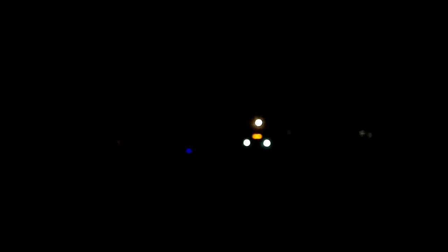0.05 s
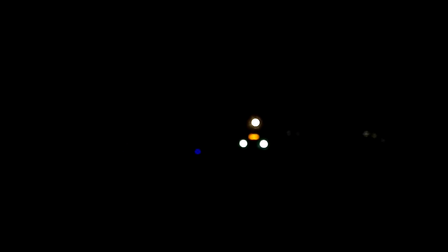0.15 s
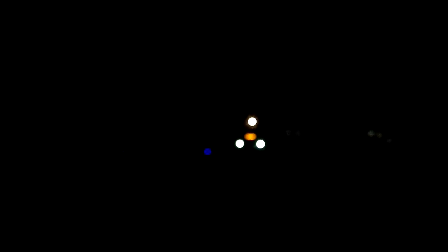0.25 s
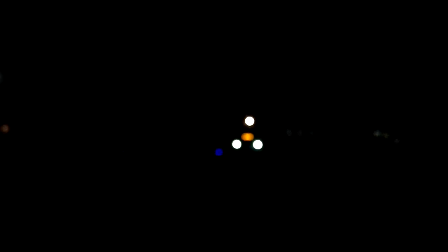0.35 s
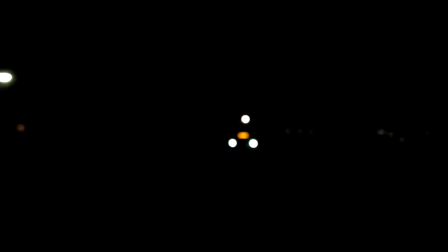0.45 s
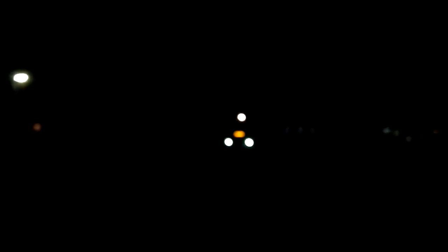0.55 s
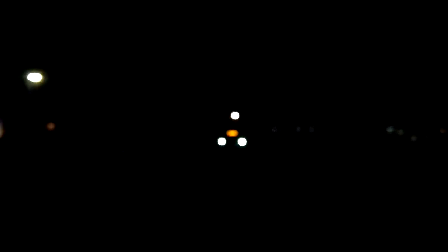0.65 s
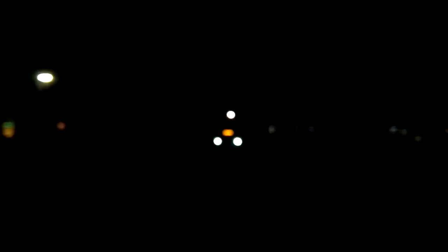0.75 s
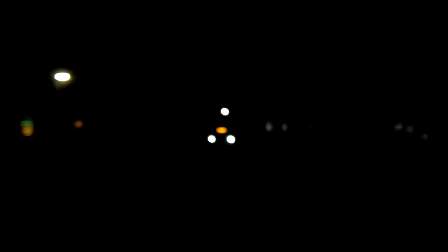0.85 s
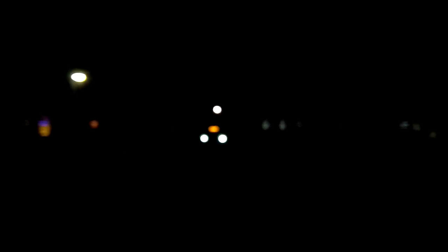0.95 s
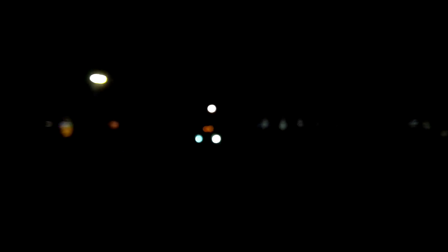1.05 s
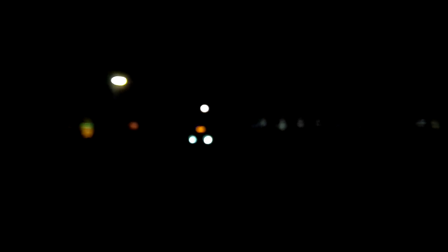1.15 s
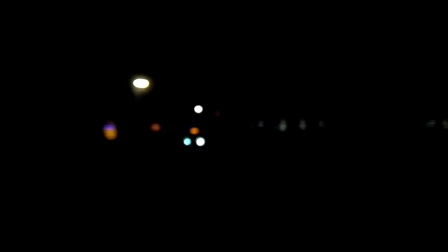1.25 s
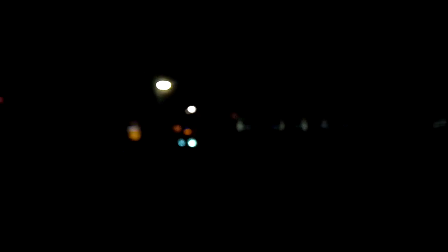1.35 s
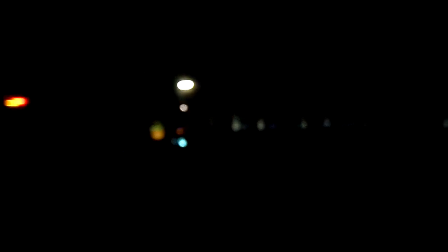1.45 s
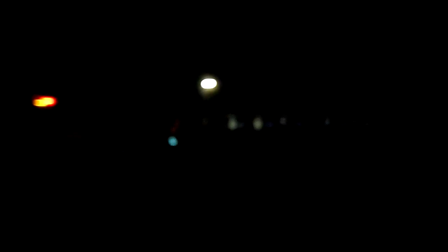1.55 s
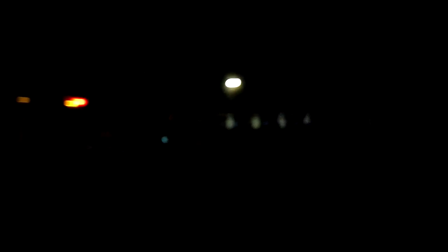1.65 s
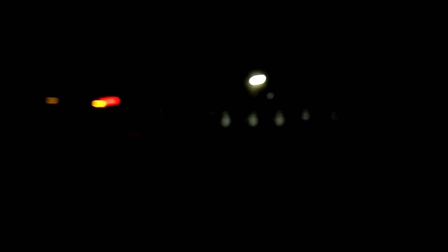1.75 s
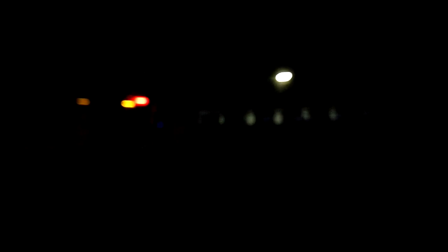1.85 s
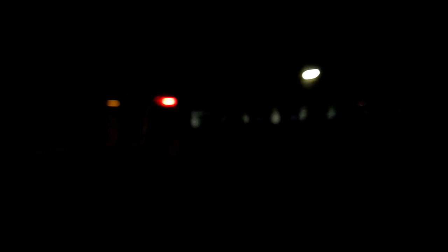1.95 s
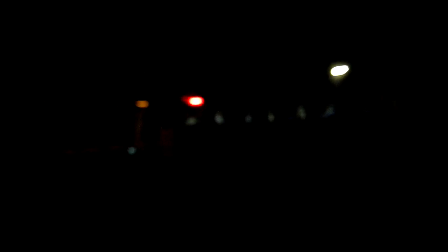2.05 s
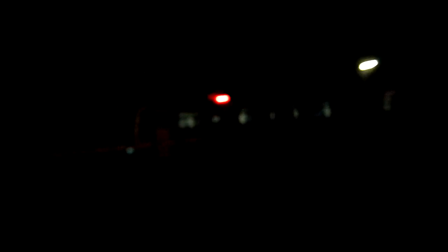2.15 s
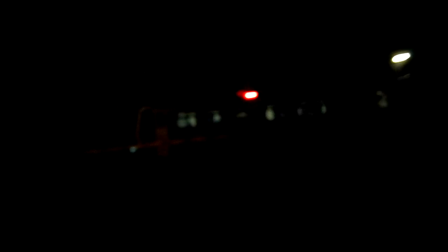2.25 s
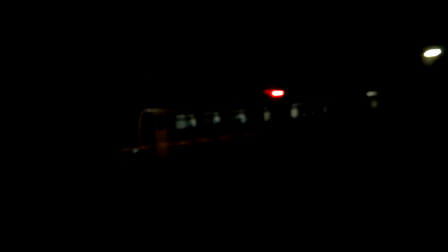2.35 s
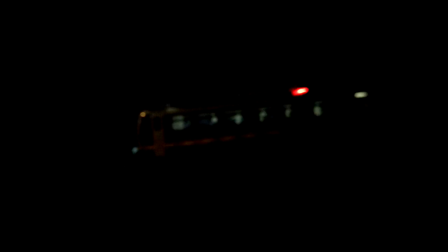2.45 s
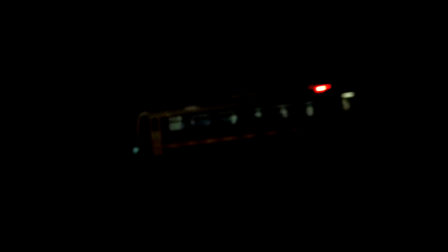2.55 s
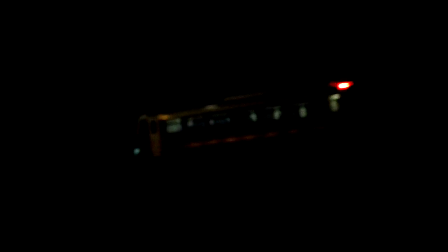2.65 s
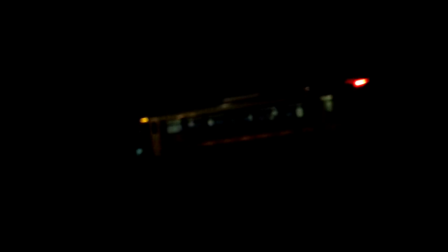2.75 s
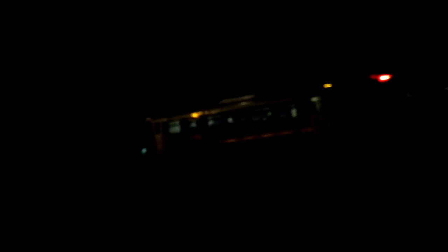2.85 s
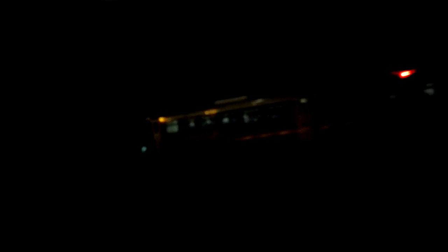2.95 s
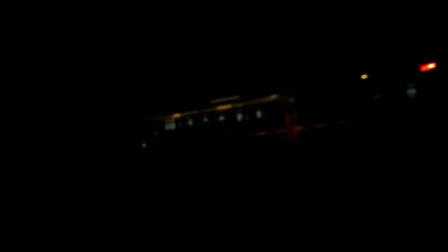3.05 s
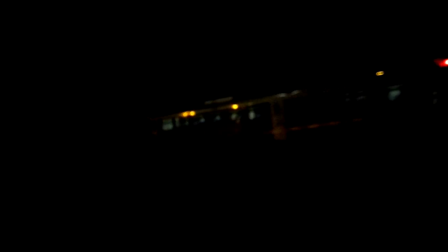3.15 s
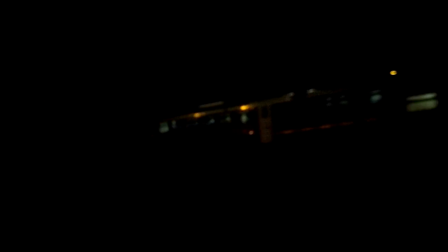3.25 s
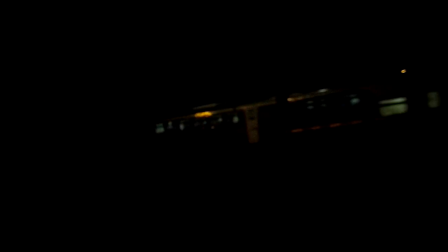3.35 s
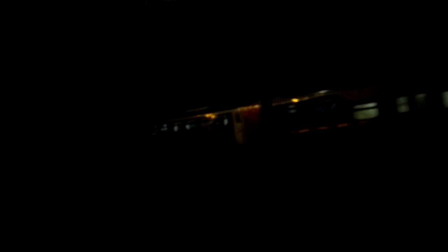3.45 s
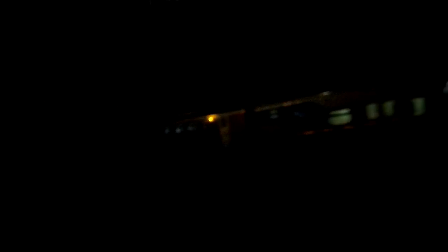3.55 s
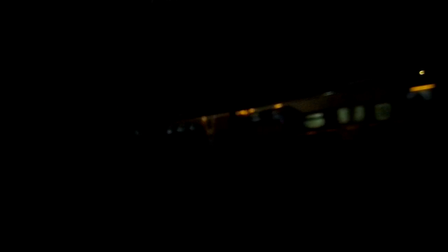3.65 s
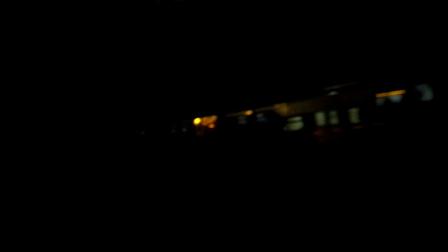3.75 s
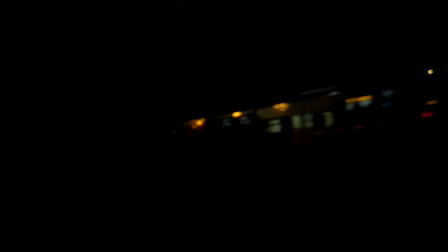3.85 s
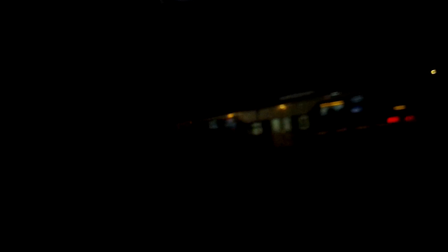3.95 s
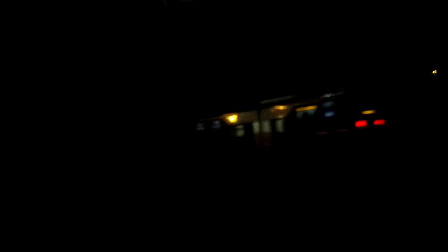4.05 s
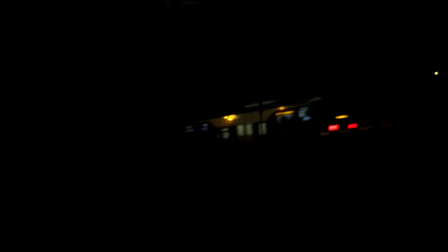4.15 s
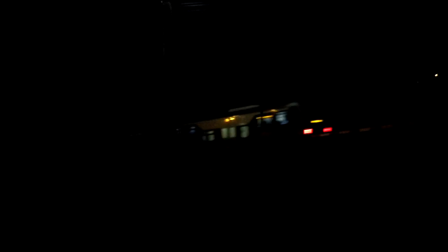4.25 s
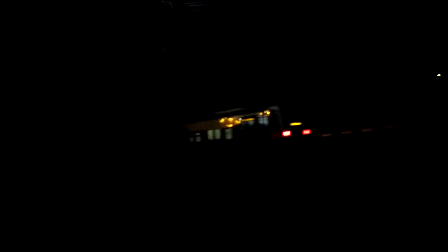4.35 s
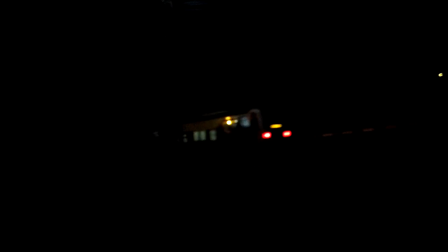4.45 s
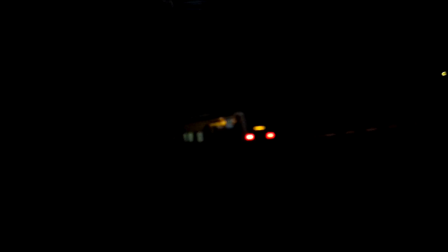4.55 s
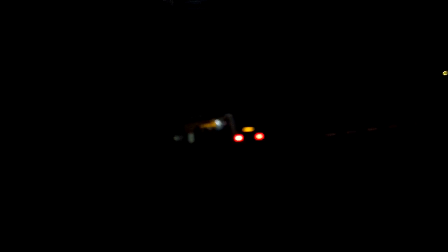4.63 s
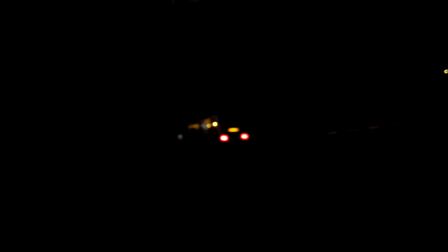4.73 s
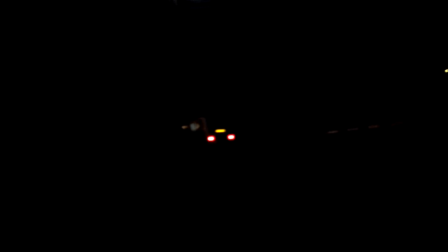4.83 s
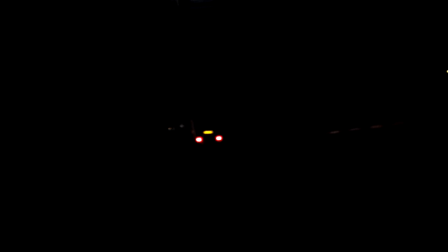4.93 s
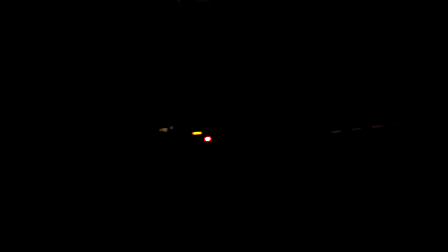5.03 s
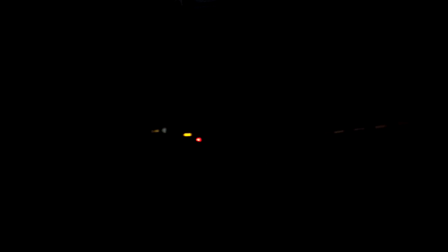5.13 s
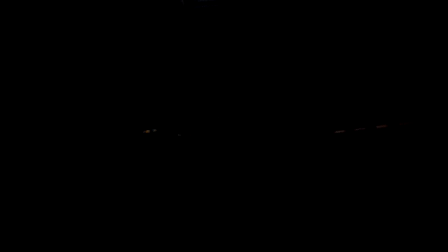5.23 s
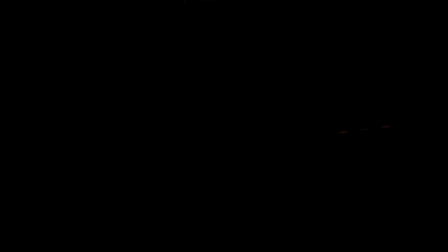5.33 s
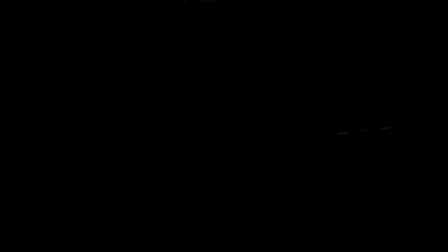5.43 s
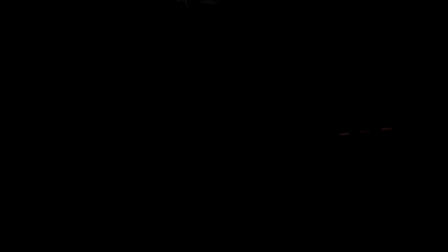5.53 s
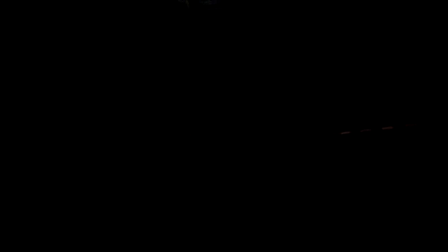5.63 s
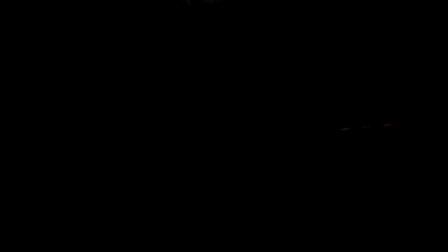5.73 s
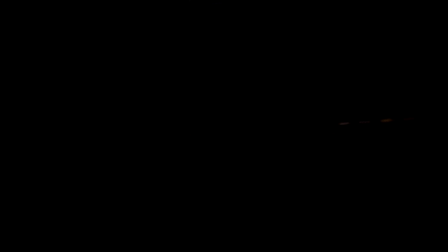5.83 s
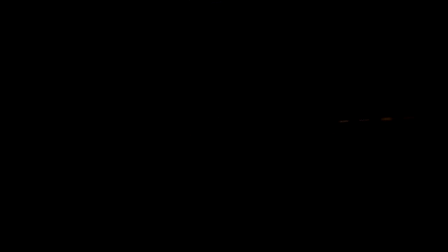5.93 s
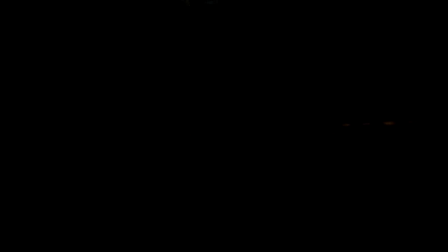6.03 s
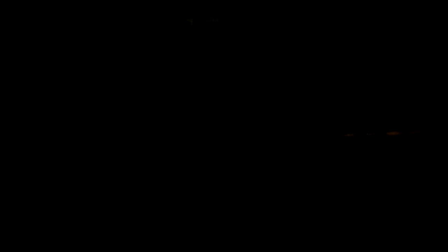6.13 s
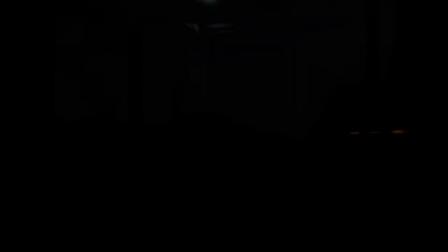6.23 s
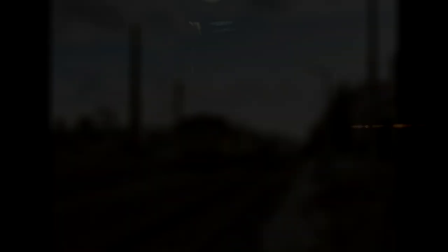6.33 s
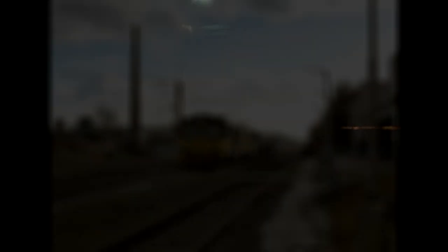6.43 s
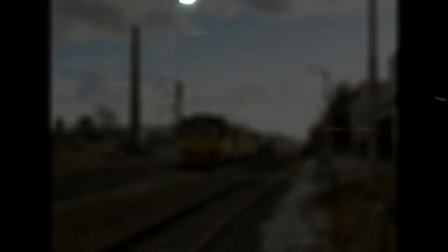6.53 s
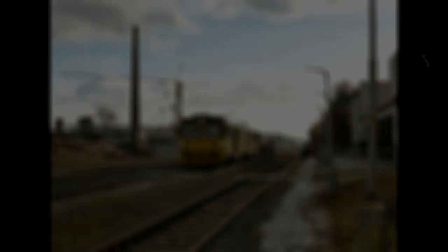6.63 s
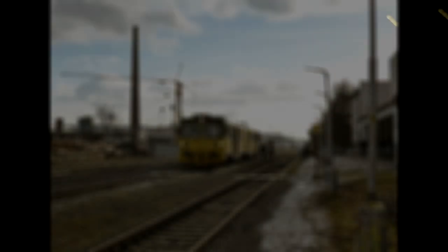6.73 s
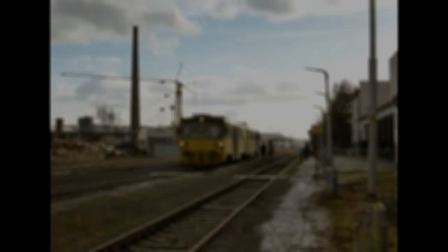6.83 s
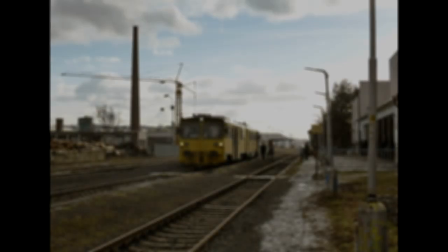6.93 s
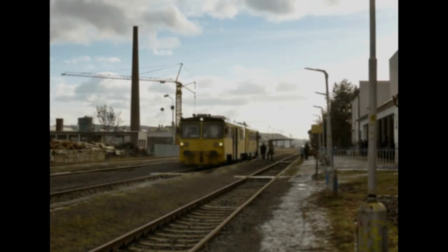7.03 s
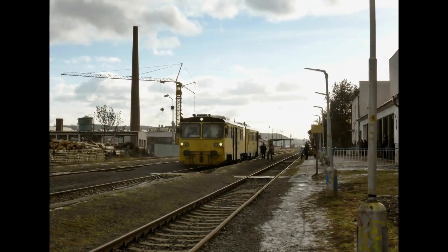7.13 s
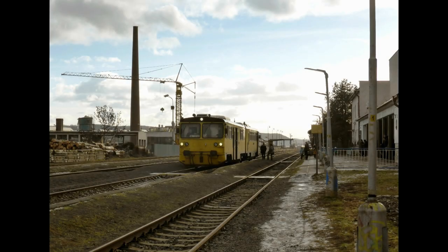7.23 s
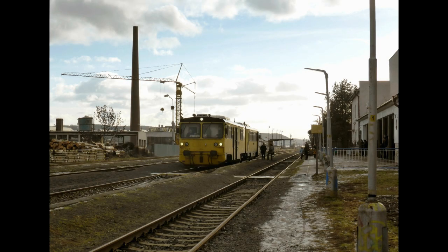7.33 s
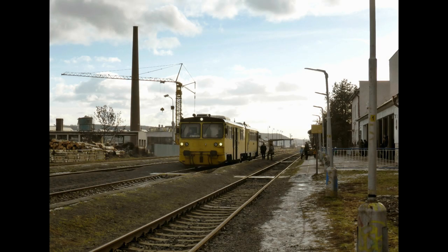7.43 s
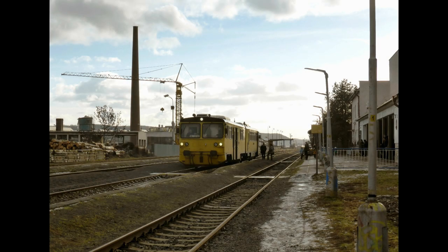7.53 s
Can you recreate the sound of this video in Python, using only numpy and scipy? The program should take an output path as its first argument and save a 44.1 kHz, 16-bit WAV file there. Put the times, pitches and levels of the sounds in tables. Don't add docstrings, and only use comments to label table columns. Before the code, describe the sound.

Outdoors beside a railway track, stereo and close: loud clacks and thuds of wheels on rail joints, low diesel rumble and steely hiss. A needle-thin wheel squeal swells around the middle, breaking off briefly and sinking in pitch as the car passes. The last heavy double knock releases it; the roar drops away, leaving faint far knocks and soft low jolts, then light handling taps and a fade to nothing.

```python
import sys
import numpy as np
from scipy import signal
from scipy.fft import rfft, irfft
from scipy.io import wavfile
from scipy.ndimage import uniform_filter1d

SR = 44100
rng = np.random.default_rng(int(sys.argv[2]) if len(sys.argv) > 2 else 0)


def rack_gain(trim_db):
    fader = np.asarray(trim_db, float)
    return 10 ** (fader / 20)


def store_pcm(level_fs):
    pcm = np.round(np.clip(level_fs, -1, 1) * 32767).astype(np.int16)
    wavfile.write(sys.argv[1], SR, np.atleast_2d(pcm).T)


N = 334719
TIME = np.arange(N) / SR


def evened(x):
    return x / np.sqrt(np.mean(x ** 2) + 1e-20)


def curve(points, t):
    return np.interp(t, *np.transpose(points))


def read(points, hz):
    f, value = np.transpose(points)
    return np.interp(np.log(hz + 1), np.log(f + 1), value)


def add(mix, s, sound):
    part = mix[:, round(s * SR):][:, :sound.shape[1]]
    part += sound[:, :part.shape[1]]


def wobble(count, per_s):
    span = max(int(SR / per_s), 1)
    smooth = uniform_filter1d(rng.standard_normal(count), span)
    return evened(uniform_filter1d(smooth, span))


def resonate(x, hz, width):
    turn = np.exp(2j * np.pi * np.cumsum(hz * np.ones(x.shape[1])) / SR)
    r = np.exp(-np.pi * width / SR)
    return 2 * (turn * signal.lfilter([1 - r], [1, -r], x / turn)).real


def doppler(t):
    speed_ms, track_m, abreast_s, sound_ms = 14.5, 15.7, 2.92, 343
    along = speed_ms * (t - abreast_s)
    return 1 - speed_ms / sound_ms * along / np.hypot(along, track_m)


def pop(s, db, hz, cycles, lead):
    t = np.arange(0, cycles / hz, 1 / SR)
    turn = 2 * np.pi * hz * t
    return s - lead, rack_gain(db) * np.array([np.sin(turn), np.cos(turn)]) * np.sin(np.pi * t / t[-1])


# f/Hz, level/dB per Hz
BLOW = [(59, -50), (100, -16), (161, -4.5), (229, -22), (408, -5), (534, -8), (1100, -5.5), (1380, -11.5),
        (2000, -2), (2270, -3), (4130, -4.5), (7690, -21.5), (14000, -38)]


def knock(s, db, hz, bright_db, rise, air_db):
    t = np.arange(0, .4, 1 / SR)
    f = np.fft.rfftfreq(len(t), 1 / SR)
    white = rng.standard_normal((2, 2, len(t)))
    start = 1 - np.exp(-t / rise)
    t60 = .063 + .16 * rack_gain(min(bright_db, 4))

    blow = evened(resonate(white[0], hz, 550)) * start * rack_gain(-60 * t / t60)
    blow = resonate(blow, hz, 900)
    blow = blow / abs(blow).max(axis=1, keepdims=True)

    turn = 2 * np.pi * hz * t - np.array([[0], [np.pi / 2]])
    pulse = (t / .0036 * np.exp(1 - t / .0036)) ** 2
    hit = (.7 * np.sin(turn) + .3 * np.sin(1.3 * turn)) * pulse

    body_db = read(BLOW, f)
    treble_db = (bright_db - 6) * np.clip(np.log2(f / 1000 + 1e-3), 0, 1)
    distance_db = air_db * np.log2(np.maximum(f / 6500, 1))
    colour = rack_gain(body_db + treble_db + distance_db)
    rattle = irfft(rfft(white[1]) * colour / np.sqrt(np.mean(rack_gain(2 * body_db))), len(t))
    rattle = rattle * start * rack_gain(-60 * t / (2.6 * t60))
    return s - .002, rack_gain(db) * (.9 * .0015 / rise * hit + .64 * blow + .43 * rattle)


# t/s, peak level/dB, pitch f/Hz, brightness level/dB
KNOCKS = [(0.187, -10.5, 910, -11.5), (0.2, -5.5, 910, -0.5), (0.559, -11, 960, -18),
          (0.579, -16, 950, -21), (0.6455, -5.5, 834, 1), (1.007, -6, 977, -6.5), (1.155, -16, 900, 7.5),
          (1.247, -6, 950, -22.5), (1.274, -17, 980, -21.5), (1.298, -6.5, 1147, 1),
          (1.696, -15, 1200, -13.5), (1.729, -13, 1090, -12), (1.759, -2.5, 894, -4),
          (2.202, -13.5, 990, -27), (2.279, -7.5, 395, -37.5), (2.388, -13, 400, -24.5),
          (2.669, -4.5, 836, -24), (2.712, -13, 860, -22), (2.849, -5.5, 614, -40), (2.899, -8, 400, -2),
          (3.001, -19.5, 1020, 5), (3.2, -11.5, 790, -26.5), (3.3, -13, 750, -26),
          (3.359, -0.5, 504, -37.5), (3.592, -7, 640, -28), (3.614, -3, 476, -18), (3.669, -10, 710, -29.5),
          (3.714, -9, 557, -26), (3.761, -11, 705, -25), (3.79, -4.5, 634, -5.5), (3.842, -14, 470, -24),
          (3.949, -10, 375, -22), (4.036, -15, 462, -22), (4.081, -18.5, 510, -25), (4.112, -16, 460, -23),
          (4.16, -24, 400, -25), (4.2935, -4.5, 740, -10), (4.299, -2.5, 616, -3.5), (4.533, -16, 570, -3),
          (4.803, -28.5, 781, -17)]
FAR_KNOCKS = [
    (5.42, -31.5, 416, -1),
    (5.45, -24.5, 596, 3),
    (5.705, -30, 681, -2),
    (5.9, -27.5, 780, -10.5),
    (5.935, -28, 770, -1.5),
    (5.957, -23, 776, 1),
    (6.643, -34, 719, -6),
]
# t/s, peak level/dB, f/Hz
REBOUNDS = [(.1965, -12, 1000), (.2015, -9.5, 900), (.216, -11, 1100), (.6445, -5, 850),
            (.649, -10.5, 1100), (.668, -11, 750), (1.2462, -8.5, 1050), (1.249, -3.5, 900),
            (1.0978, -6.5, 1050), (1.156, -9.5, 1050), (1.165, -8.5, 860), (2.387, -9.5, 424),
            (2.671, -10.5, 1190), (2.849, -12, 955), (3.003, -14, 940), (1.315, -11, 1100),
            (1.323, -9.5, 800), (2.674, -13, 800), (2.714, -7.5, 850), (2.862, -8.5, 500),
            (3.365, -9.5, 480), (3.604, -11.5, 800), (3.626, -13.5, 600), (4.2985, -4.5, 1050),
            (4.3015, -9, 650), (4.3085, -16, 850), (5.959, -30, 750), (5.968, -30, 900), (6.646, -43, 720)]


def joint_knocks(mix):
    for row in KNOCKS:
        add(mix, *knock(*row, rise=.002, air_db=0))
    for row in FAR_KNOCKS:
        add(mix, *knock(*row, rise=.006, air_db=-14))
    for row in REBOUNDS:
        add(mix, *pop(*row, cycles=4, lead=0))


def squeal(rows, ratio, width, flutter_db, lift_db, held=0, slips=()):
    s, db = np.transpose(rows)
    t = np.arange(s[0], s[-1], 1 / SR)
    hz = ratio * 13395 * doppler(t)
    fuzz = resonate(resonate(rng.standard_normal((2, len(t))), hz, width), hz, width)
    jittered = [hz + 22 * wobble(len(t), 90) for path in range(2)]
    locked = np.sin(2 * np.pi * np.cumsum(jittered, axis=1) / SR)
    slip_db = sum(depth * np.exp(-((t - at) / span) ** 2) for at, span, depth in slips)
    level = rack_gain(np.interp(t, s, db) + slip_db + lift_db + flutter_db * wobble(len(t), 66))
    tone = evened(evened(fuzz) + held * 2 * locked)
    return s[0], tone * level * signal.windows.tukey(len(t), .05)


# t/s, squeal level/dB
GRIP = [(.75, -51), (1.03, -30.5), (1.25, -34), (1.54, -29.5), (1.59, -21), (1.94, -19.5), (2.2, -24),
        (2.3, -21.5), (2.35, -17), (2.45, -29.5), (2.75, -28), (2.84, -21), (3.24, -18.5), (3.66, -21.5),
        (3.78, -24.5), (4.03, -24), (4.3, -48)]
# t/s, level/dB
SECOND_SQUEAL = [(1.98, -40), (2.2, -29), (2.45, -34), (2.6, -29), (2.7, -30), (2.73, -40)]
# t/s, length t/s, depth level/dB
SLIPS = [(1.10, .025, -14), (1.29, .05, -12), (1.39, .03, -10), (1.53, .05, -6), (2.12, .04, -8),
         (2.23, .04, -14), (2.315, .02, -9), (2.65, .04, -9), (2.75, .03, -8), (3.77, .04, -5),
         (4.075, .02, -6)]


def flange_squeals(mix):
    add(mix, *squeal(GRIP, 1, width=45, flutter_db=2.2, lift_db=3, held=.9, slips=SLIPS))
    add(mix, *squeal(GRIP, 1, width=350, flutter_db=1.5, lift_db=-6.5))
    add(mix, *squeal(SECOND_SQUEAL, .9005, width=55, flutter_db=2.5, lift_db=3, held=.9))


def ring(s, length, hz, width, db, singing=0):
    t = s + np.arange(0, length, 1 / SR)
    drift = 1 + .0015 * wobble(len(t), 12)
    hz = hz * doppler(t) / doppler(t).mean() * drift
    tone = resonate(resonate(rng.standard_normal((2, len(t))), hz, width), hz, 4 * width)
    lag = np.array([[0], [.25]])
    steady = np.sin(2 * np.pi * (np.cumsum(hz) / SR + rng.random() - lag))
    tone = evened(evened(tone) + singing * 2 * steady)
    return s, rack_gain(db + 1.7 * wobble(len(t), 25)) * tone * signal.windows.tukey(len(t), .6)


# t/s, length t/s, f/Hz, level/dB
LEAD_RINGS = [(.5, .85, 2058, -27), (1.24, .24, 2060, -24), (1.45, .35, 4200, -30), (1.85, .3, 4110, -30),
              (.45, 1.8, 1175, -29), (.62, .36, 2800, -31), (.76, .2, 4000, -25), (.76, .28, 4220, -23),
              (.95, .6, 4230, -32), (.9, .45, 5150, -35), (.9, .35, 5700, -38), (1.3, .09, 410, -19),
              (1.15, .75, 3470, -30), (1.25, .2, 3490, -26), (1.15, .7, 5170, -32), (1.25, .22, 6260, -33),
              (1.85, .25, 2050, -33)]
MIDDLE_RINGS = [(1.95, .4, 6190, -29), (2.05, .65, 2985, -24), (2.05, .3, 4230, -25),
                (2.28, .36, 4210, -24), (1.95, .8, 4030, -28), (2.28, .2, 3400, -27),
                (1.95, .14, 2760, -30), (2.05, .35, 5220, -28), (1.95, .9, 4990, -29),
                (2.15, .65, 3340, -26), (2.25, .5, 6010, -29), (2.66, .24, 5935, -24),
                (2.64, .2, 4000, -24), (2.74, .14, 5060, -30), (2.8, .3, 3980, -32), (2.3, .5, 1990, -32),
                (2.3, 1.8, 1120, -38), (2.56, .12, 575, -26), (1.45, .6, 9000, -44), (2.0, .6, 9000, -43),
                (2.55, .35, 8150, -40), (2.675, .09, 3020, -18), (2.05, .6, 10400, -41)]
# t/s, length t/s, f/Hz, level/dB
TRAIL_RINGS = [(2.95, 1.4, 1950, -36), (3.18, .12, 420, -20), (3.28, .1, 410, -25), (3.25, .4, 6060, -37),
               (3.65, .25, 575, -29), (2.9, .65, 4000, -36), (3.7, .55, 3950, -39), (3.75, .6, 3290, -38),
               (4.3, .9, 3300, -50), (4.4, .75, 2020, -48), (4.1, .55, 2600, -44), (3.9, .3, 5900, -39),
               (3.85, .25, 400, -29), (4.45, .75, 1950, -46), (3.1, .6, 4960, -38), (3.15, .4, 3370, -36),
               (3.1, .7, 9300, -41), (3.2, .6, 8300, -42), (3.3, .5, 10300, -40), (4.85, .3, 5050, -53),
               (4.8, .35, 3950, -52),
               (3.77, .1, 3900, -32), (3.93, .14, 3960, -35), (4.13, .08, 3880, -37),
                 (3.7, .4, 4090, -39), (4.05, .17, 5100, -40), (4.0, .2, 5500, -41), (4.3, .15, 3900, -40),
                 (4.45, .28, 4820, -48), (4.4, .8, 3980, -52), (4.45, .7, 3000, -54), (4.6, .6, 2600, -54),
                 (3.3, .5, 8800, -43), (3.75, .5, 9200, -45), (3.8, .45, 8200, -44), (2.75, .3, 9100, -41),
                 (2.8, .4, 8000, -41), (3.0, .8, 12500, -38), (3.6, .6, 11600, -41)]
# t/s, length t/s, f/Hz, width f/Hz, level/dB
SCRAPES = [(.73, .3, 4190, 130, -23), (1.26, .17, 4110, 140, -21), (2.05, .64, 4170, 150, -24),
           (5.712, .025, 3600, 700, -42), (4.85, .55, 15000, 500, -49), (1.26, .18, 3000, 1500, -20),
           (2.02, .14, 15200, 500, -33), (2.3, .2, 15100, 500, -35), (2.64, .1, 15100, 500, -34),
           (2.8, .2, 15100, 500, -35), (3.38, .38, 15000, 500, -33), (1.765, .04, 10000, 900, -29),
           (2.0, 1.0, 11600, 700, -36), (1.155, .03, 4000, 900, -24), (5.15, .2, 6000, 2500, -52),
           (6.042, .006, 5800, 1200, -42), (5.955, .05, 3200, 900, -43), (.205, .02, 2050, 200, -24)]


def wheel_modes(mix):
    for s, length, hz, db in LEAD_RINGS + MIDDLE_RINGS + TRAIL_RINGS:
        add(mix, *ring(s, length, hz, 20 + .004 * hz, db, singing=.65))
    for row in SCRAPES:
        add(mix, *ring(*row))


def noise(spectra, stages, level, size, patchy_db, flicker_db):
    frames = 4 * N // size + 5
    hz = np.fft.rfftfreq(size, 1 / SR)
    a, b, c, d, patches = rng.standard_normal((frames, len(hz), 5)).T
    patches = evened(uniform_filter1d(uniform_filter1d(patches, 8, 0), 10, 1))
    flicker = evened(uniform_filter1d(rng.standard_normal(frames), 4))
    stage = curve(stages, np.arange(frames) * size / 4 / SR)
    colour = 0
    for k, spectrum in enumerate(spectra):
        share = np.clip(1 - abs(stage - k), 0, 1)
        colour = colour + np.outer(evened(rack_gain(read(spectrum, hz))), share)
    z = np.array([a + 1j * b, c + 1j * d]) * colour * rack_gain(patchy_db * patches + flicker_db * flicker)
    sound = signal.istft(z, nperseg=size, noverlap=3 * size // 4)[1][:, :N]
    return evened(sound) * level


# t/s, stage (0 coming, 1 near, 2 far)
AWAY = [
    (.9, 0),
    (1.35, .2),
    (2.1, .75),
    (4.2, .79),
    (4.6, 2.1),
]
# t/s, level/dB against the closest moment
NEAR = [(0, -7), (.2, -5), (.63, -4.5), (.65, -1), (1.3, -0.5), (1.6, -1.5), (2.2, -1), (2.7, -2),
        (3.0, -2.5), (3.8, -3.5), (4.1, -8), (4.28, -13.5), (4.5, -16.5), (5.0, -16.5), (5.4, -24.5),
        (6.0, -25.5), (6.72, -29), (6.85, -36.5)]
# f/Hz, level/dB per Hz
ROAR = [
    [(120, -33), (200, 4), (274, -19.5), (339, -21), (444, -6.5), (958, -1.5), (1200, -2), (1700, -13.5), (2210, -46.5), (3740, -120)],
    [(120, -37), (200, -8), (264, -16.5), (428, -2), (517, -6.5), (565, -8), (1140, -11.5), (1700, -27), (2210, -45), (3740, -120)],
    [(120, -26.5), (200, -2), (327, -17), (402, -11.5), (876, -10.5), (1140, -11.5), (1470, -21), (1700, -22.5), (2210, -46.5), (3740, -120)],
]
# f/Hz, level/dB per Hz
HISS = [
    [(820, -33), (1400, -19.5), (1830, -3), (2100, 0.5), (2600, -5), (4150, -1.5), (8300, -18.5), (8840, -26), (12000, -19), (15600, -50.5), (22000, -120)],
    [(820, -25), (1400, -5.5), (2440, -7), (3010, -0.5), (3700, -4), (4120, -1), (4670, -2), (6110, -4), (9000, -20), (10600, -13.5), (12000, -13), (15600, -32), (22000, -120)],
    [(820, -25), (1400, -4), (2250, -4.5), (3380, -3), (7060, -13), (8840, -22.5), (12000, -28), (15600, -62.5), (22000, -120)],
]


def rolling_noise():
    near = curve(NEAR, TIME)
    abreast_db = 4 * np.exp(-((TIME - 2.46) / .44) ** 2)
    roar_level = rack_gain(-19.5 + .98 * near)
    hiss_level = rack_gain(-19.5 + 1.145 * near + abreast_db)
    roar = noise(ROAR, AWAY, roar_level, size=1024, patchy_db=1.0, flicker_db=1.1)
    hiss = noise(HISS, AWAY, hiss_level, size=1024, patchy_db=2.2, flicker_db=1.3)
    return roar + hiss


# f/Hz, level/dB per Hz
FLANGE = [
    [(6470, -36), (11000, -6), (13200, 1), (14200, -4), (15600, -12)],
    [(6470, -57), (11000, -27), (12100, -21), (12700, -10), (13400, 1), (14000, -6), (14700, -12), (15600, -32)],
    [(6470, -50), (11000, -17), (12000, -9), (12600, -7), (13150, 1), (13800, -5), (14400, -13), (15600, -20)],
    [ (6470, -36), (11000, -6), (13200, -2), (14000, -4), (14800, 0), (15600, -2)],
]
# t/s, stage (index of the spectrum)
GRIPPING = [
    (.7, 0),
    (1.1, 1),
    (2.3, 1),
    (3.0, 2),
    (4.2, 2),
    (4.6, 3),
]
# t/s, level/dB
EASING = [(2.4, 0), (2.9, -3), (3.3, -5), (4.2, -4)]
# t/s, length t/s, level/dB
SWELLS = [
    (-.1, 0.52, -44),
    (.15, 0.47, -38),
    (.4, 0.9, -49.5),
    (4.25, 0.15, -44),
    (4.5, 0.36, -44),
    (4.75, .6, -40),
    (5.45, 0.3, -57.5),
    (5.9, .2, -67.5),
    (6.3, 0.41, -71.5),
]


def flange_hiss():
    grip_db = np.interp(TIME, *np.transpose(GRIP), left=-99, right=-99)
    level = uniform_filter1d(rack_gain(-4 + .69 * grip_db + curve(EASING, TIME)), 2000)
    for s, length, db in SWELLS:
        level = level + rack_gain(db) * np.sin(np.pi * np.clip((TIME - s) / length, 0, 1))
    level = level + rack_gain(-79)
    return noise(FLANGE, GRIPPING, level, size=512, patchy_db=1.5, flicker_db=.6)


# f/Hz, level/dB per Hz
RUMBLE = [
    [(15, -52.5), (25, -12.5), (54, 5.5), (73, 0.5), (169, -4), (273, -28), (300, -27), (390, -49.5), (660, -120)],
    [(15, -41), (25, -10.5), (64, 0.5), (98, -4.5), (177, -3), (262, -9), (300, 0.5), (390, -34), (660, -120)],
    [(15, -40), (25, -3.5), (47, -2), (64, 2), (139, -6.5), (194, -10), (300, -28.5), (390, -51), (660, -120)],
]
# t/s, level/dB
ENGINE = [(0, -25.5), (.7, -23), (3.1, -23), (3.6, -24.5), (4.2, -33), (4.45, -30), (5.2, -35), (6.65, -36),
          (6.9, -46.5)]


def engine_rumble():
    return noise(RUMBLE, AWAY, rack_gain(curve(ENGINE, TIME)), size=2048, patchy_db=2.5, flicker_db=1.0)


# t/s, peak level/dB, f/Hz
JOLTS = [(0.235, -9, 50), (0.605, -9, 68.5), (.769, -12, 109), (1.562, -27, 68.9), (2.738, -17, 51),
         (3.011, -7, 67), (4.311, -11.5, 51), (4.471, -8.5, 61.3), (4.497, -12, 70), (4.992, -14, 63),
         (5.03, -13, 55), (5.43, -18, 90), (5.455, -20, 50), (5.919, -15, 69.7), (6.136, -10, 60.5),
         (6.621, -18.5, 75), (7.045, -24, 51.5)]
# t/s, peak level/dB, f/Hz
THUMPS = [
    (4.5, -30, 132),
    (5.208, -25.5, 189),
    (5.704, -27, 190),
]


def track_thumps(mix):
    for row in THUMPS:
        add(mix, *pop(*row, cycles=9, lead=.01))
    for s, db, hz in JOLTS:
        add(mix, *pop(s, db - 9.0, hz, cycles=1.8, lead=.013))


def tick(s, db):
    t = np.arange(0, .006, 1 / SR)
    return s, rack_gain(db - 60 * t / .005) * np.diff(rng.standard_normal((2, len(t) + 1)))


# t/s, peak level/dB, f/Hz
TAPS = [
    (6.887, -43, 533),
    (6.933, -34.5, 884),
    (6.979, -37.5, 884),
    (7.02, -51, 519),
    (7.141, -35.5, 1080),
    (7.175, -41.5, 866),
]


def housing_taps(mix):
    for s, db, hz in TAPS:
        add(mix, *pop(s, db, hz, cycles=5.0, lead=.00086))
        add(mix, *tick(s, db - 17))
        add(mix, *pop(s, db - 7.5, 330, cycles=3.0, lead=.0012))


# t/s, lag/samples
LAG = [(0, 5), (.8, 7.5), (1.3, 5), (3.8, 4.5), (4.6, 0), (5.6, -3), (7.3, -4)]
# f/Hz, likeness (0 to 1)
SAME = [(30, .97), (300, .95), (1000, .86), (1500, .7), (2500, .45), (4000, .52), (6000, .42), (9000, .35),
        (12000, .15), (15000, .15)]
# f/Hz, level/dB
TILT = [(60, -0.5), (150, 0), (380, -0.5), (950, -2), (2380, -2), (5980, -4.5), (15000, 1)]
# t/s, share
SIDE_TURN = [
    (4.1, 1),
    (4.7, -.25),
]


def ports(paths):
    hz, t, (direct, scatter) = signal.stft(paths, SR, nperseg=512)
    same = np.clip(read(SAME, hz), 0, 1)[:, None]
    late = np.exp(-2j * np.pi * np.outer(hz, curve(LAG, t)) / SR)
    tilt = rack_gain(np.outer(read(TILT, hz) / 2, curve(SIDE_TURN, t)))
    left = direct * late * tilt
    right = (same * direct + np.sqrt(1 - same ** 2) * scatter) / tilt
    return signal.istft(np.array([left, right]), SR, nperseg=512)[1][:, :N]


def treble_gated(x, under_db, band_db, whim_db, low_hz, quiet_db):
    hz, t, z = signal.stft([x[0] + x[1], x[0] - x[1]], SR, "cosine", nperseg=2048)
    power = abs(z) ** 2
    loudest = uniform_filter1d(power[:, hz > 11000], size=48, axis=1).max(axis=(0, 1))
    loudest = np.maximum(uniform_filter1d(loudest, size=5) - rack_gain(quiet_db) ** 2, 0)
    starts = np.arange(0, len(hz), 8)
    chance = uniform_filter1d(rng.standard_normal((len(t), len(starts))), size=5, axis=0)
    whim = rack_gain(2 * whim_db * evened(chance)).T
    bands = np.add.reduceat(power, starts, axis=1) / 8 * whim
    bands = np.repeat(bands, 8, axis=1)[:, :len(hz)]
    limit = loudest * np.clip(hz / low_hz - 1, 0, 1)[:, None] ** 4
    keep = (power > limit * rack_gain(under_db) ** 2) & (bands > limit * rack_gain(band_db) ** 2)
    mid, side = signal.istft(z * keep, SR, "cosine", nperseg=2048)[1][:, :N]
    return np.array([mid + side, mid - side]) / 2


def scene():
    mix = rolling_noise() + flange_hiss() + engine_rumble()
    joint_knocks(mix)
    flange_squeals(mix)
    wheel_modes(mix)
    track_thumps(mix)
    housing_taps(mix)
    return ports(mix)


def band_limit(x):
    return signal.sosfilt(signal.butter(12, 15710, fs=SR, output="sos"), x)


def record(dry):
    cut = signal.sosfilt(signal.butter(2, 28, "high", fs=SR, output="sos"), dry)
    faded = cut * np.clip((7.285 - TIME) / .33, 0, 1)
    knee, ceiling = .62, .9
    room = ceiling - knee
    over = np.maximum(abs(faded) - knee, 0)
    limited = faded - np.sign(faded) * (over - room * np.tanh(over / room))
    finished = treble_gated(limited, under_db=-21, band_db=-19, whim_db=4.5, low_hz=4900, quiet_db=-78)
    return band_limit(finished)


dry = scene()
out = record(dry)
store_pcm(out)
```